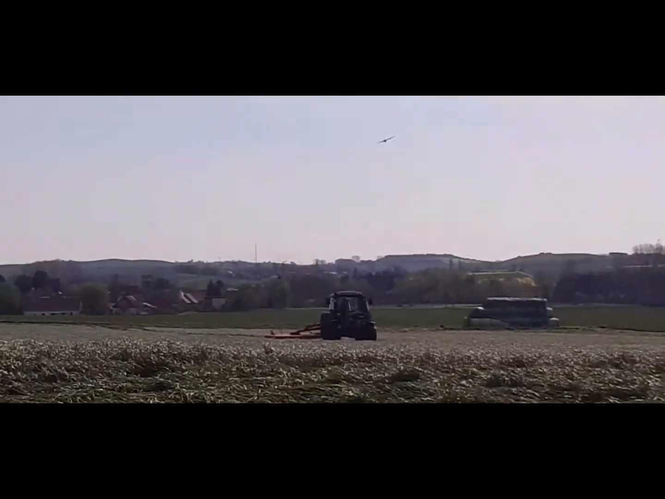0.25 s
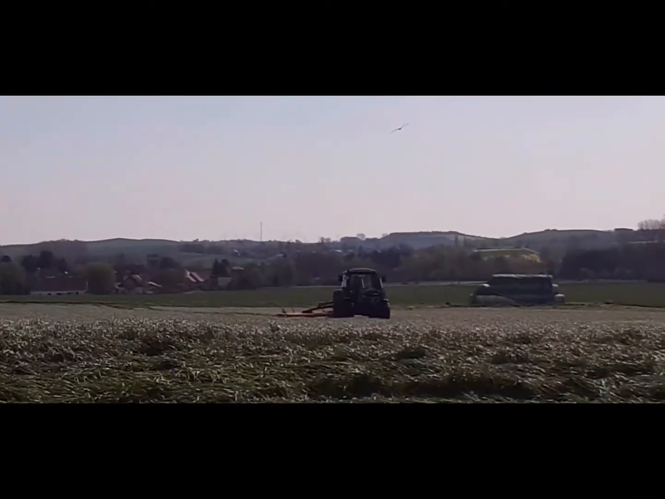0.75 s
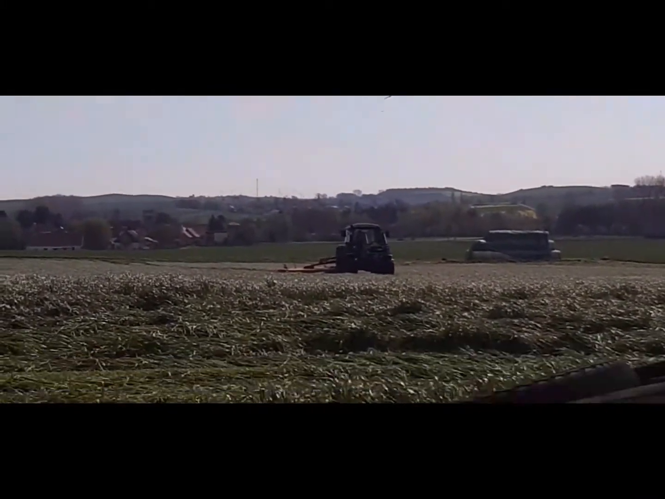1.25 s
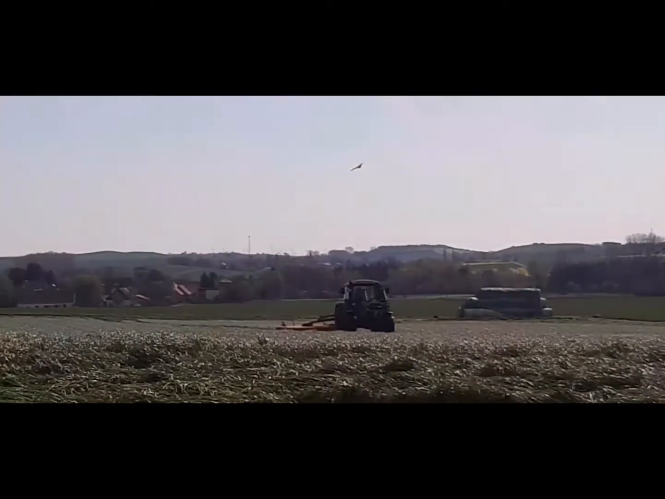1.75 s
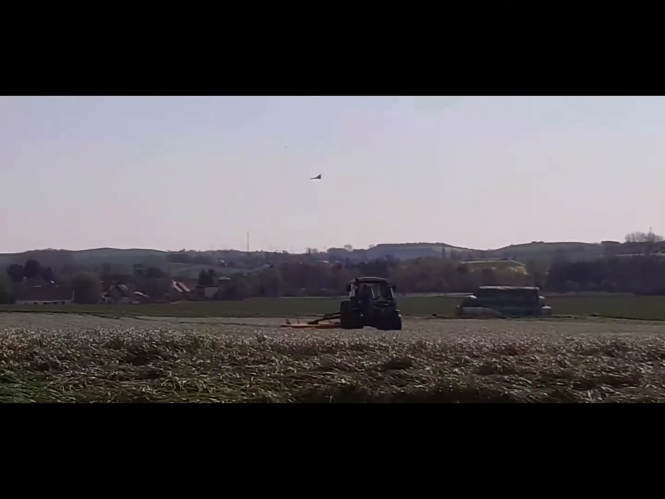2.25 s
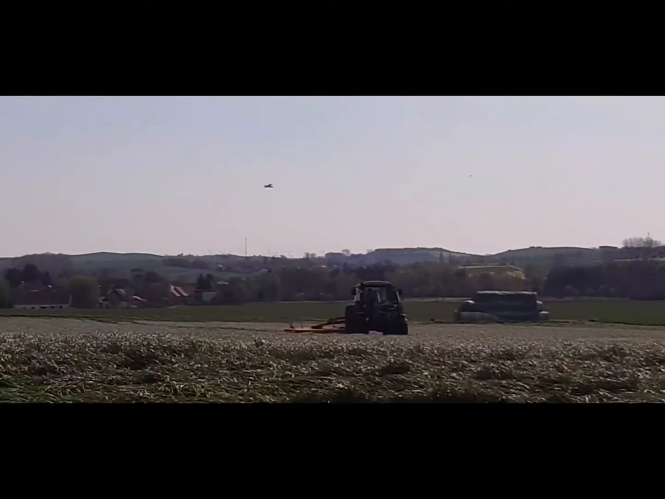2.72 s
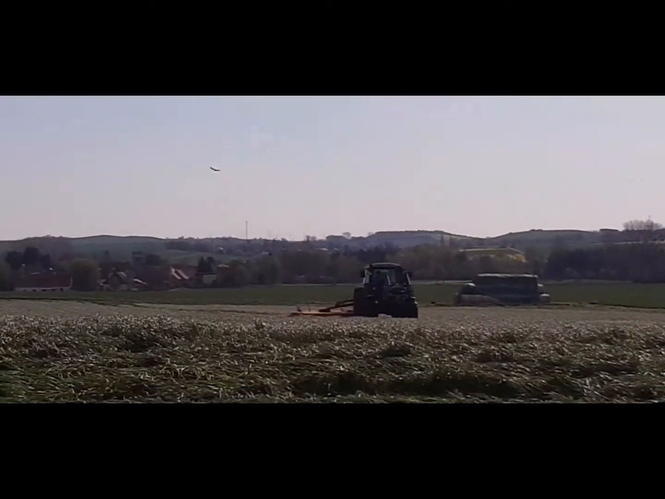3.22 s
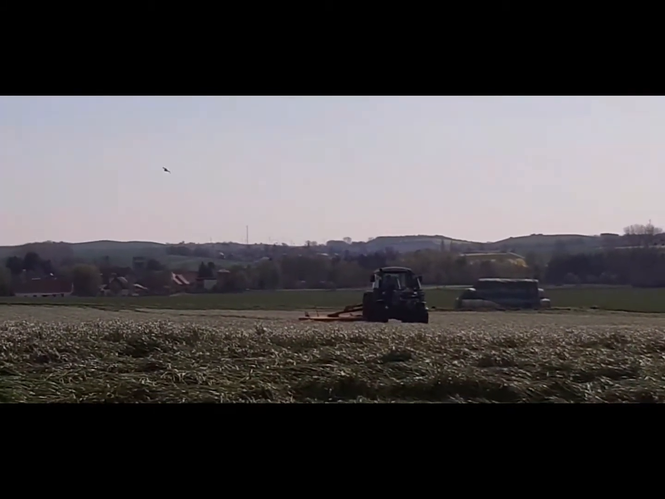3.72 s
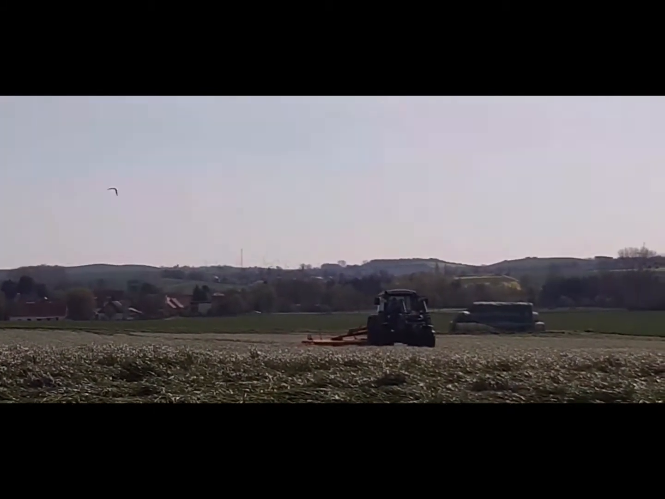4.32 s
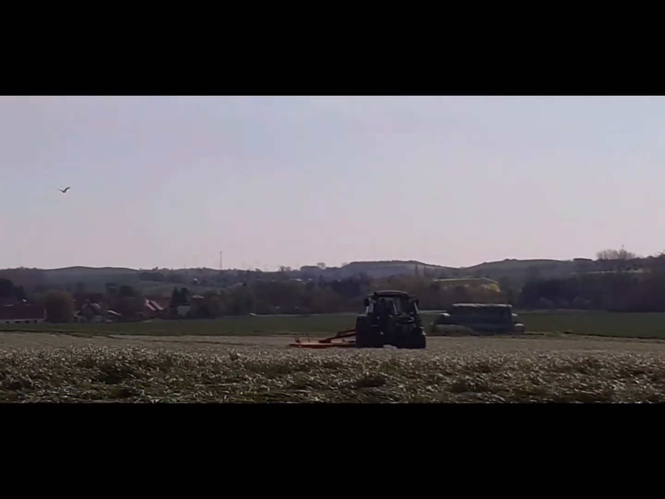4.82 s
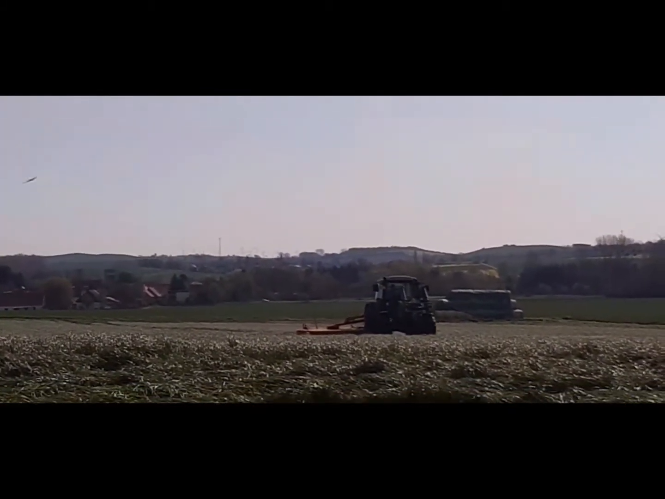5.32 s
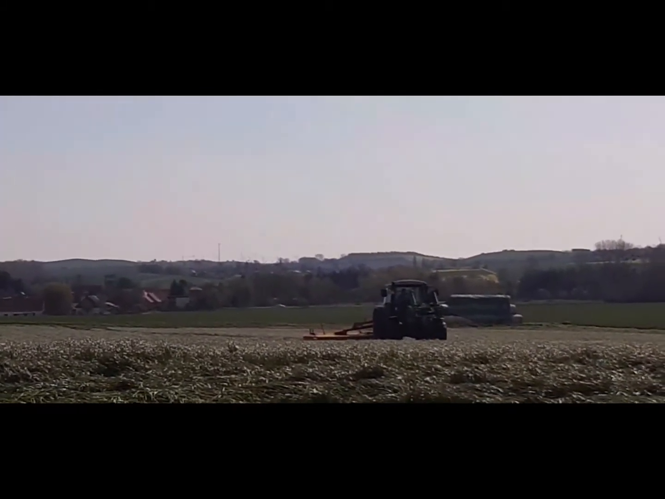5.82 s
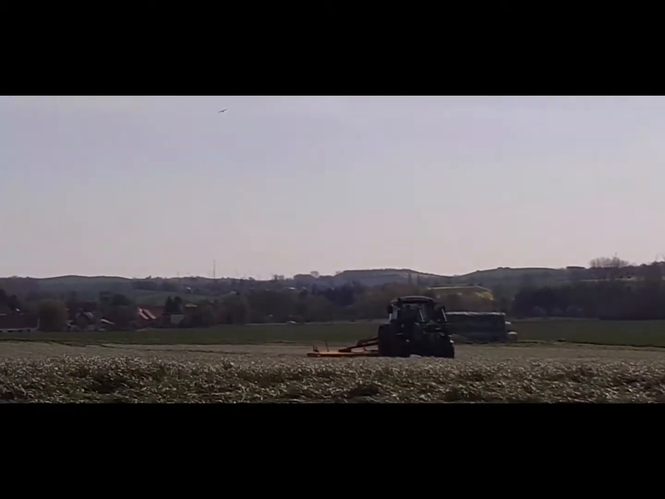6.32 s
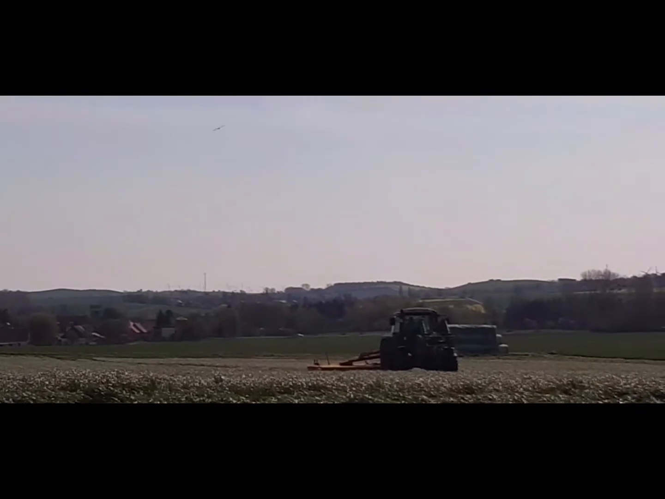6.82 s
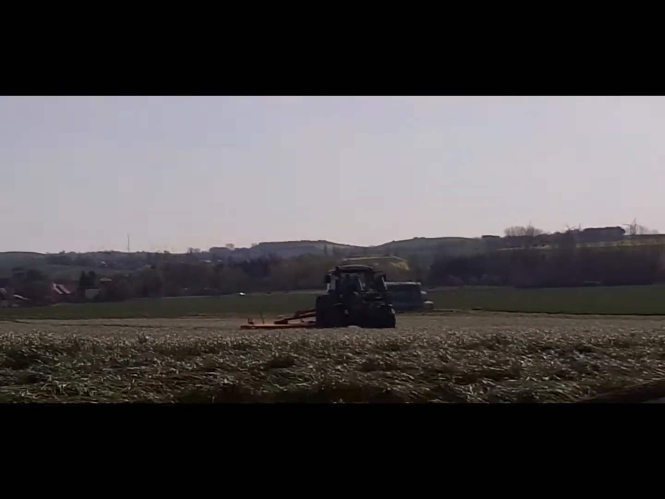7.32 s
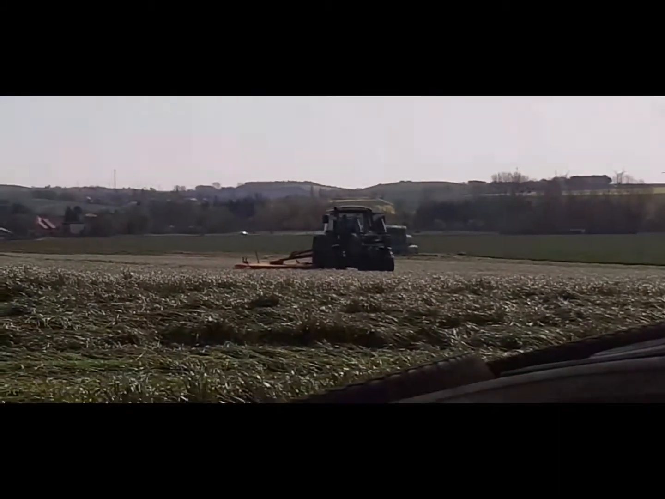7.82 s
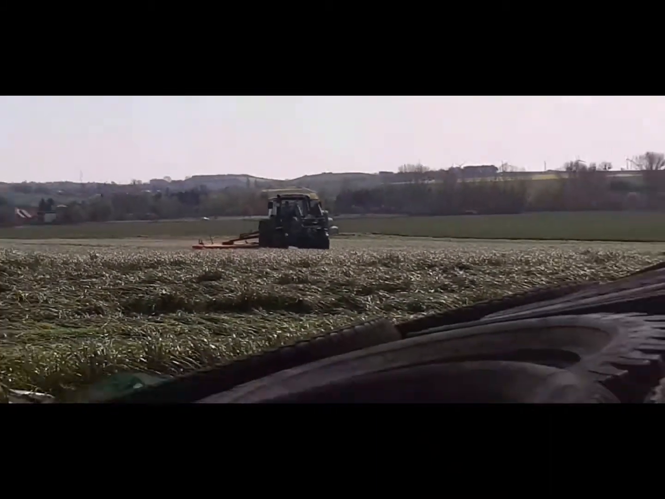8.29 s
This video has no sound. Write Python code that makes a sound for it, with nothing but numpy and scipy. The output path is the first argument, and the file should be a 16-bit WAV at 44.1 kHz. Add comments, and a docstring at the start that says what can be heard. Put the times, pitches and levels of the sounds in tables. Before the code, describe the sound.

A distant tractor mows an open field throughout. Its diesel engine and mower make a low, even drone of gently wavering tones over a dull roar, growing gradually louder until the end at about 8.5 seconds. Wind rumbles close on the hand-held microphone, with short puffs on the left at the start and just after 1 second, followed by small finger ticks and rubs on the casing. Another light tick comes near 4.5 seconds. A far bird gives two barely audible high peeps, around 3 and 5.7 seconds. From about 5.7 seconds the wind strengthens into low, choppy gusts that jump between left and right. At 7.2 seconds one sharp handling knock on the left is the loudest sound, with faint rubbing after it. The hardest buffeting follows from 7.5 seconds, with dull slaps of air on the right until 8 seconds, a few more ticks, and rumble on the left.

```python
"""Open farmland, far from a field being mown, on the two microphones of a hand-held camera.
The tractor slowly draws nearer: its six-cylinder diesel and the mower geared to it drone as two combs
of steady tones that beat over a dull roar. Close up, wind buffets the microphone ports, hardest near
the end, and fingers tick and rub on the casing. A far bird peeps twice."""
import sys
import numpy as np
from scipy import signal
from scipy.fft import rfft, irfft, next_fast_len
from scipy.io import wavfile
from scipy.ndimage import uniform_filter1d

SR = 44100
rng = np.random.default_rng(int(sys.argv[2]) if len(sys.argv) > 2 else 0)


def generate_wav(sig):
    """Save sig (samples, or channels by samples) to the path in sys.argv[1] as 16-bit PCM at SR."""
    pcm = np.round(np.clip(np.atleast_2d(sig).T, -1, 1) * 32767).astype(np.int16)
    wavfile.write(sys.argv[1], SR, pcm)


N = 377055

# how the two ports hear the tractor: f/Hz, left minus right/dB, left lead/rad, likeness of the roar/0-1
PORT_RESPONSE = [(60, 0, 0.34, 0.59), (102, 3.5, -0.087, 0.95), (132, 0.5, -0.11, 0.97),
                 (198, 2.5, 0.089, 1), (258, 0.5, -0.29, 0.89), (347, -0.5, 0.43, 0.88),
                 (650, 4, 0.83, 0.85), (1190, 0, -0.31, 0.22)]


def tractor():
    """Diesel and mower locked to one engine speed, far off and growing louder as they near."""
    # engine speed: t/s, firing rate/Hz
    firing_rate = [(0, 103.3), (.5, 103.12), (1, 102.9), (1.5, 102.85), (2, 103.14), (2.5, 103.03),
                   (3, 103.31), (3.5, 103), (4, 103.3), (4.5, 103.21), (5, 102.9), (5.5, 103.19),
                   (6, 103.36), (6.5, 103.43), (7, 103.34), (7.5, 103.08), (8, 102.78), (8.55, 102.87)]
    # the slow approach: t/s, level of the firing tone/dB, level of the exhaust's upper tones/dB
    approach = [(0, -39, -72.5), (.6, -40.5, -58), (1.6, -37.5, -57), (2.8, -36.5, -51.5),
                (4.1, -34.5, -52), (5.9, -34, -57), (6.5, -35, -52.5), (7.6, -32.5, -53.5),
                (8.55, -30, -52)]
    firings = np.cumsum(curve(firing_rate)) / SR
    firing_db, upper_db = curve(approach), curve(approach, column=2)
    rise_db = firing_db + 40  # above the firing tone's level at the far end of the field
    drone = diesel(firings, firing_db, upper_db, rise_db) + mower(firings, rise_db)
    return at_ports(drone + roar(rise_db) + treble(firings))


def diesel(firings, firing_db, upper_db, rise_db):
    """Exhaust pulses make a firing tone and its harmonics; uneven cylinders add half multiples."""
    # exhaust tones besides the firing tone and its octave: multiple of the firing rate, relative level/dB
    exhaust = [(.5, -18), (1.5, -4.5), (2.5, -8), (3, -1), (3.5, -1), (4, -8.5), (5, -18.5), (6, -29.5),
               (7, -38)]
    firing_tone = gain_of(firing_db) * comb(firings, [(1, 0)], flutter_db=.66)
    octave = gain_of(-44.5 + .55 * rise_db) * comb(firings, [(2, 0)], flutter_db=.5)
    return firing_tone + octave + gain_of(upper_db) * comb(firings, exhaust, flutter_db=3)


def mower(firings, rise_db):
    """The drive shaft, geared to the engine, sounds its own comb; every fourth tone is a blade pass."""
    # shaft tones: multiple of the shaft rate, relative level/dB
    shaft_tones = [(4, -5), (5, -13), (7, -6.5), (8, -2.5), (9, -8), (10, -11), (11, -15.5), (12, 0),
                   (13, -23.5), (14, -15.5), (15, -14.5), (16, -15), (18, -25), (20, -25.5), (21, -16.5),
                   (22, -15), (25, -26.5)]
    firings_per_turn, lead_turns = 6.20985, .0461
    turns = firings / firings_per_turn + lead_turns
    return gain_of(-45 + .25 * rise_db) * comb(turns, shaft_tones, flutter_db=.62, pulses=4)


def roar(rise_db):
    """Noise of engine and cutter, dulled by the soft ground on its way to the microphones."""
    # spectrum of the roar: f/Hz, relative level/dB
    spectrum = [(20, -22), (45, -10), (105, -1.5), (140, -5), (172, 0), (215, -4), (280, -11.5), (365, -4),
                (410, -10), (450, -19), (620, -31.5), (800, -42.5), (1100, -46), (2000, -67)]
    level = gain_of(-45.5 + .14 * rise_db) * drift(.59, 1.4)
    return level * noise(spectrum, patchy_db=2.1, likeness=.98, size=4096)


def treble(firings):
    """The top of the roar and a faint whine of high firing tones, blurred on the long path."""
    # the top of the roar comes and goes: t/s, level/dB
    top_levels = [(0, -90.5), (.64, -77.5), (1.8, -90.5), (2.28, -81), (2.8, -87), (4.2, -86.5), (4.6, -81),
                  (5.3, -87.5), (5.74, -74.5), (6.8, -81.5), (7.33, -72), (7.86, -82.5), (8.2, -72),
                  (8.55, -77.5)]
    # whine tones: multiple of the firing rate, level/dB
    whine_tones = [(7, -99), (8, -94), (9, -93.5), (10, -97.5)]
    # one tone swells for a while: t of the crest/s, length/s, multiple of the firing rate, rise/dB
    swells = [(2.303, 0.47, 7, 7), (2.344, 0.26, 8, 10.5), (3.079, 0.6, 9, 10.5), (4.797, .5, 10, 7.5),
              (5.999, 0.65, 10, 4.5), (6.203, .9, 8, 13), (6.5, 0.46, 10, 7), (6.897, .4, 9, 5)]
    band = filtered(rng.standard_normal((2, N)), 2, [620, 1300], "band")
    top = gain_of(curve(top_levels)) * drift(3.1, 3) * evened(band)
    step = 8  # the tones are low enough to build at an eighth of the rate
    t, whine = np.arange(0, N, step) / SR, 0
    for multiple, db in whine_tones:
        swell_db = sum(rise_db * np.exp(-.5 * (3 * (t - crest) / length) ** 2)
                       for crest, length, which, rise_db in swells if which == multiple)
        blur_turns = .14 * np.log(drift(11, 15, step))
        tone = np.cos(2 * np.pi * (multiple * firings[::step] + blur_turns))
        whine += gain_of(db + swell_db) * drift(4.5, 5, step) * tone
    return top + np.sqrt(2) * signal.resample_poly(whine, step, 1)[:N]


def wind():
    """Right at each port: a light breeze, lumpy buffeting as the wind rises, single gusts and slaps."""
    # strength of the buffeting: t/s, left level/dB, right level/dB
    strength = [(0, -44, -58), (.5, -47, -60), (.9, -55, -55), (1.45, -44, -41.5), (2.1, -47, -57.5),
                (3.9, -48, -48), (4.3, -55.5, -42.5), (4.6, -58, -57), (5.55, -56, -52), (5.8, -36, -32),
                (6.2, -45, -41.5), (6.5, -35.5, -35), (6.9, -38, -44.5), (7.35, -42.5, -52),
                (7.55, -32.5, -36), (7.75, -30.5, -30.5), (7.95, -28.5, -35.5), (8.1, -34.5, -51),
                (8.55, -22.5, -50.5)]
    # the strongest gusts: t of the crest/s, port (0 left, 1 right), level at the crest/dB, length/s
    gusts = [(.15, 0, -29.5, 0.041), (1.078, 0, -31, 0.057), (1.129, 0, -22.5, 0.017),
             (4.257, 1, -39, 0.095), (5.718, 1, -28.5, 0.044), (5.77, 0, -31, 0.04), (6.05, 1, -28, 0.032),
             (6.162, 1, -25, 0.04), (6.438, 0, -23, 0.055), (7.54, 0, -25.5, 0.074),
             (7.66, 0, -31.5, 0.059), (7.68, 1, -23.5, 0.072), (7.77, 0, -23.5, 0.031),
             (7.84, 0, -26.5, 0.13), (7.884, 0, -25, 0.032), (7.92, 1, -24, 0.043),
             (7.971, 1, -19.5, 0.049), (8.317, 0, -25, .08), (8.49, 0, -41, 0.1)]
    top_hz = [105, 146]  # left, right
    out = np.zeros((2, N))
    for port in range(2):
        breeze = drift(5.2, 6.5) * evened(filtered(rng.standard_normal(N), 2, [45, 110], "band"))
        lumps = evened(drift(5, 14) * buffet(top_hz[port], N))
        out[port] = gain_of(-58) * breeze + gain_of(curve(strength, column=port + 1)) * lumps
    t = np.arange(-6000, 6000) / SR
    for crest, port, db, length in gusts:
        shape = np.exp(-.5 * (2.24 * t / length) ** 2)
        air = buffet(top_hz[port], len(t)) * shape
        air *= np.sqrt(np.sum(shape ** 2) / np.sum(air ** 2))  # rms 1 at the crest
        part = out[port, max(round(crest * SR) - 6000, 0):][:len(t)]
        part += gain_of(db) * air[:len(part)]
    return out + slaps()


def buffet(top_hz, samples):
    """Choppy low noise with a steep top: small eddies miss the port."""
    air = filtered(rng.standard_normal(samples + 4000), 2, top_hz)
    air = filtered(air, 6, 2.03 * top_hz)
    return filtered(air, 2, 72, "high")[4000:]  # once the filters have settled


def slaps():
    """Sudden slaps of air on the right port inside the strongest gusts, rounded by its mesh."""
    # slaps of air: t/s, level/dB, f/Hz
    hits = [(6.043, -18.5, 116.4), (7.627, -22.5, 220), (7.6733, -12, 160), (7.69, -22, 193),
            (7.7217, -21.5, 256), (7.748, -26, 219), (7.777, -29.5, 235), (7.867, -23, 173),
            (7.8814, -18, 213), (7.894, -21, 222), (7.92, -21, 205), (7.954, -8.5, 176), (7.9758, -24, 177),
            (7.984, -14, 164), (8.007, -29, 252)]
    out = np.zeros((2, N))
    for start, db, hz in hits:
        sharp_edge = .16 * thump(2.8 * hz, swell=.86, lead=.43)
        slap = filtered(thump(hz, swell=.26, lead=.25) + sharp_edge, 6, 700)
        out[:, round((start - .0008) * SR):][:, :len(slap)] += sides(db, pan_db=-28.5) * slap
    return out


def finger_ticks():
    """Fingers tap the casing beside the ports: a dull knock plus a dry snap, brighter for a nail."""
    # taps: t/s, level/dB, left minus right/dB, snap against knock/dB, tilt of the snap/dB per octave
    taps = [(1.189, -53, -13, 4, 9), (1.274, -41, 18, 0, -9), (1.544, -65.5, -18, 23.5, 8),
            (4.5465, -47, -20, 10, 12.5), (7.132, -51, -8, 10.5, 1), (7.143, -26, 32, -6.5, -13),
            (7.2186, 0.5, 39, -9, -5.5), (7.455, -42, -27, -5, 5), (8.036, -32.5, -12, 0, -5),
            (8.218, -48, 24, 6, -4), (8.262, -44.5, -24, 2, 2)]
    # spectrum of the casing's snap: f/Hz, relative level/dB
    casing = [(500, -19.5), (1200, -19), (2000, 6), (3000, 6), (4500, 2.5), (6600, 5), (8800, -10.5),
              (11500, -2), (15000, -20)]
    knock_hz, hz = 933, abs(np.fft.fftfreq(2048, 1 / SR))
    knock = thump(knock_hz, swell=.43, lead=.088) + .083 * thump(.29 * knock_hz, swell=.33, lead=.9)
    out = np.zeros((2, N))
    for start, db, pan_db, snap_db, tilt_db in taps:
        colour_db = at_hz(casing, hz) + tilt_db * np.log2(np.clip(hz, 500, 7000) / 7000)
        log_spectrum = np.conj(signal.hilbert(np.log(gain_of(colour_db))))  # minimum phase: abrupt onset
        snap = np.fft.ifft(np.exp(log_spectrum)).real[:len(knock)]
        tick = knock + gain_of(snap_db) * snap / abs(snap).max()
        out[:, round((start + .0008) * SR):][:, :len(tick)] += sides(db, pan_db) * tick
    return out


def finger_rubs():
    """Fingers slide along the casing: grainy noise that follows their pressure. One short, fast-fading burst
    comes right after the loudest knock."""
    # strokes: t of the crest/s, rise/s, fade/dB per s, level/dB, left minus right/dB; the row at 7.224 s is a #
    # short, fast-fading burst right after the loudest knock
    strokes = [(1.2, .03, 148, -66.5, -11), (1.29, .04, 170, -65, 2), (1.56, .02, 200, -70, -12),
               (4.56, .02, 148.5, -67.5, -15), (7.224, .004, 1093, -33.5, 15), (7.235, 0.19, 50.5, -60, 1),
               (7.46, .03, 32.5, -65.5, -5.5), (7.9, .12, 40.5, -71, 2), (8.01, .04, 207, -58.5, 2.5),
               (8.07, .04, 92, -60, 5.5), (8.26, .05, 86, -65, 3)]
    # spectrum of the rubbing: f/Hz, relative level/dB
    spectrum = [(500, -15), (1000, 0), (1800, -0.5), (2800, -5.5), (4200, -3), (7000, -6), (8600, -18),
                (15000, -16.5)]
    pressure = np.zeros((2, N))
    for crest, rise, fade_db, db, pan_db in strokes:
        part = pressure[:, round((crest - rise) * SR):][:, :SR]
        t = np.arange(part.shape[1]) / SR - rise
        attack = np.clip(1 + t / rise, 0, 1) ** 2
        part += sides(db, pan_db) * attack * gain_of(-fade_db * np.maximum(t, 0))
    grain = gain_of(7.3 * uniform_filter1d(rng.standard_normal(N), size=100))
    return pressure * evened(grain * noise(spectrum, patchy_db=2.5))


def bird():
    """A far bird, alike at both ports: thin sines, one level, one arching in pitch, that fade."""
    # peeps: t/s, length/s, starting f/Hz, top f/Hz, level/dB
    peeps = [(2.971, .03, 5450, 5450, -73.5), (5.71, 0.092, 5340, 5600, -69.5)]
    out = np.zeros(N)
    for start, length, from_hz, top_hz, db in peeps:
        progress = np.linspace(0, 1, round(length * SR))
        hz = from_hz + (top_hz - from_hz) * np.sin(2.7 * progress)
        envelope = gain_of(db - 14 * progress ** 2) * np.hanning(len(hz)) ** .3
        out[round(start * SR):][:len(hz)] += envelope * np.sin(2 * np.pi * np.cumsum(hz) / SR)
    return out


def at_ports(pair):
    """The camera body shades and delays a far sound differently at each port."""
    size = next_fast_len(N)
    hz = np.fft.rfftfreq(size, 1 / SR)
    left = gain_of(at_hz(PORT_RESPONSE, hz) / 2) * np.exp(.5j * at_hz(PORT_RESPONSE, hz, column=2))
    return irfft(rfft(pair, size) * np.array([left, 1 / left]), size)[:, :N]


def comb(turns, tones, flutter_db, pulses=1):
    """Tones of a rotation, wavering in the moving air; multiples of the pulses a turn start in phase."""
    out, step = 0, 8  # low tones, built at an eighth of the rate
    for multiple, db in tones:
        start = rng.random() * (multiple % pulses > 0)
        tone = np.cos(2 * np.pi * (multiple * turns[::step] + start))
        out += gain_of(db) * drift(flutter_db, 4.3, step) * tone
    return np.sqrt(2) * signal.resample_poly(out, step, 1, padtype="line")[:N]


def thump(hz, swell, lead):
    """A cycle or two that swells and is damped at once; swell time and phase lead are in cycles."""
    turns = hz * np.arange(1500) / SR
    return (turns / swell * np.exp(1 - turns / swell)) ** 2 * np.sin(2 * np.pi * (turns + lead))


def noise(spectrum, patchy_db, likeness=0, size=1024):
    """Stereo coloured noise of rms 1 with drifting patches; likeness scales that of the two ports."""
    frames, hz = 4 * N // size + 5, np.fft.rfftfreq(size, 1 / SR)
    a, b, c, d, patches = rng.standard_normal((frames, len(hz), 5)).T
    patches = evened(uniform_filter1d(uniform_filter1d(patches, size=8, axis=0), size=10, axis=1))
    alike = np.clip(at_hz(PORT_RESPONSE, hz, column=3) * likeness, 0, 1)[:, None]
    left = a + 1j * b
    right = alike * left + np.sqrt(1 - alike ** 2) * (c + 1j * d)
    spectra = np.array([left, right]) * gain_of(at_hz(spectrum, hz)[:, None] + patchy_db * patches)
    return evened(signal.istft(spectra, nperseg=size, noverlap=3 * size // 4)[1][:, :N])


def drift(db, hz, step=1):
    """A gain that wanders by chance, db rms, no faster than hz; one value every step samples."""
    knots = np.arange(0, N + 256, 256)
    waves = sum(np.sin(2 * np.pi * (rate * knots / SR + rng.random())) / np.sqrt(rate)
                for rate in hz * np.geomspace(.08, 1, 16))
    return np.interp(np.arange(0, N, step), knots, gain_of(db * evened(waves)))


def curve(rows, column=1):
    """One column of a table over time, a value a sample."""
    return np.interp(np.arange(N) / SR, np.array(rows)[:, 0], np.array(rows)[:, column])


def at_hz(rows, hz, column=1):
    """One column of a table over log frequency."""
    return np.interp(np.log(hz + 1), np.log(np.array(rows)[:, 0] + 1), np.array(rows)[:, column])


def filtered(x, order, hz, kind="low"):
    """A low-, high- or band-pass with a flat passband."""
    return signal.sosfilt(signal.butter(order, hz, kind, fs=SR, output="sos"), x)


def sides(db, pan_db):
    """Gains of the two ports; the nearer one gets db."""
    return gain_of(db + np.minimum([[pan_db], [-pan_db]], 0))


def gain_of(db):
    """Decibels to a factor."""
    return 10 ** (np.asarray(db) / 20)


def evened(x):
    """Scales to rms 1."""
    return x / np.sqrt(np.mean(x ** 2) + 1e-20)


def scene():
    """Everything that reaches the two ports."""
    return tractor() + wind() + finger_ticks() + finger_rubs() + bird()


def record(dry):
    """The microphones' own hiss and bass cut, then the band limit."""
    # spectrum of the hiss: f/Hz, relative level/dB
    spectrum = [(500, -1), (1100, -8.5), (1700, 2), (2800, -2), (6500, -3), (8600, -15.5), (11000, -9),
                (15000, -4)]
    hiss = gain_of(-72.5) * drift(1, 1.1) * noise(spectrum, patchy_db=1)
    bass_cut = filtered(dry + hiss, 4, 45, "high")
    band_limit = signal.firwin(511, 15500, window=("kaiser", 9), fs=SR)
    return signal.oaconvolve(bass_cut, band_limit[None], "same")


dry = scene()
out = record(dry)
generate_wav(out)
```